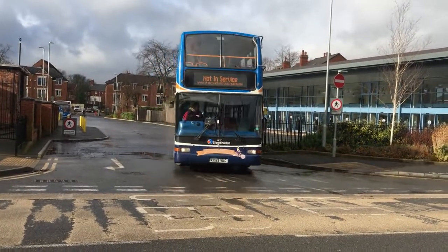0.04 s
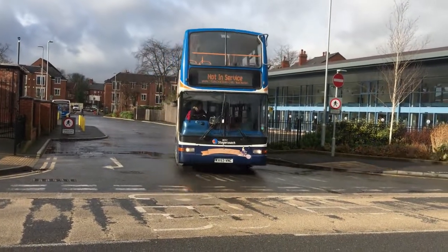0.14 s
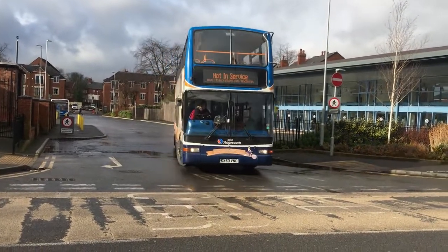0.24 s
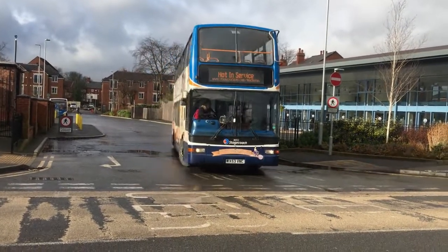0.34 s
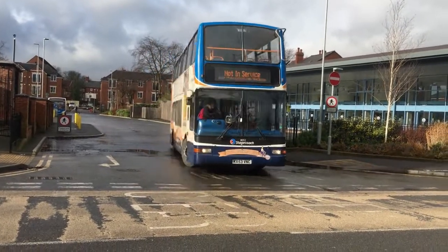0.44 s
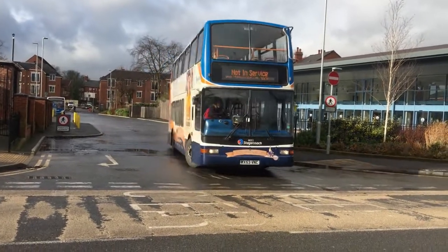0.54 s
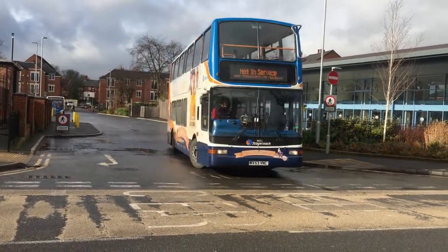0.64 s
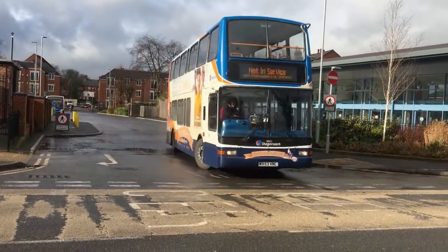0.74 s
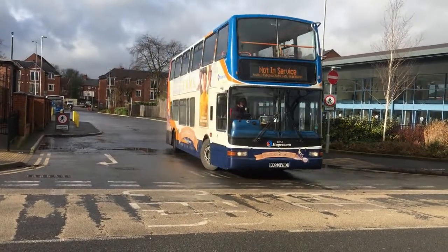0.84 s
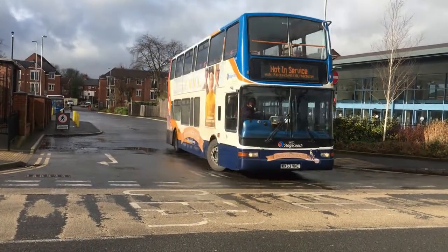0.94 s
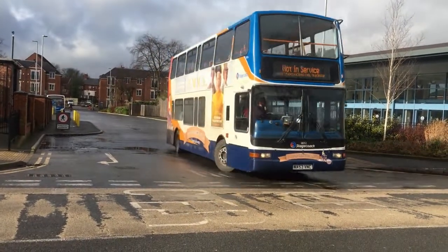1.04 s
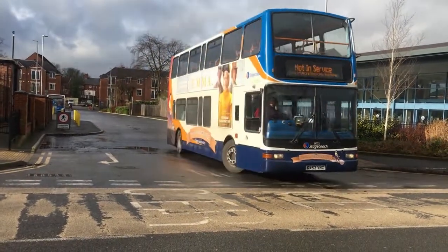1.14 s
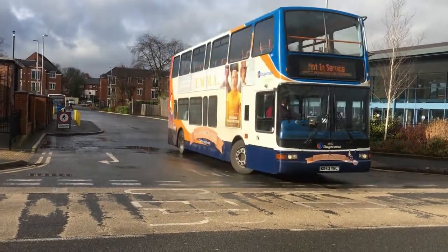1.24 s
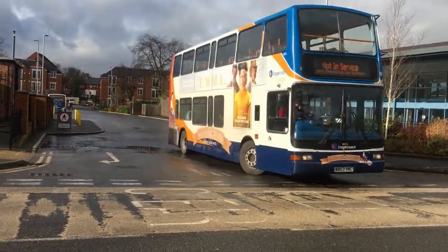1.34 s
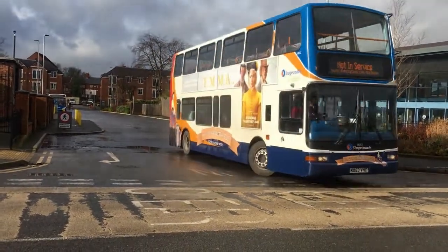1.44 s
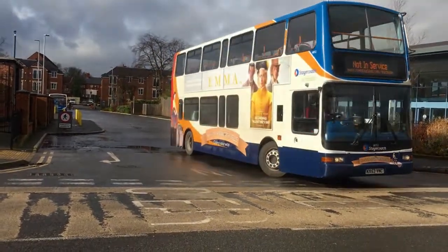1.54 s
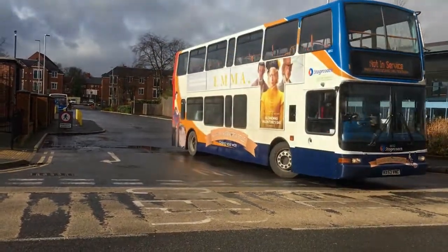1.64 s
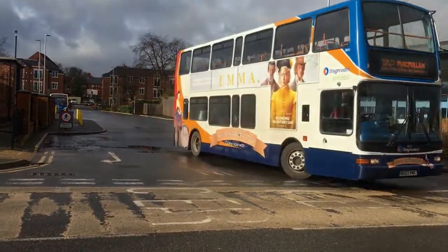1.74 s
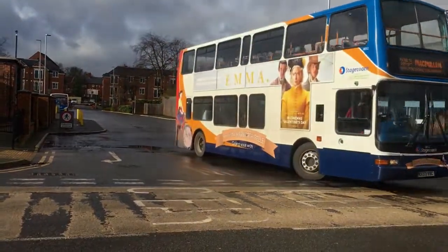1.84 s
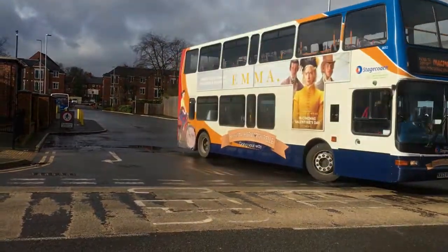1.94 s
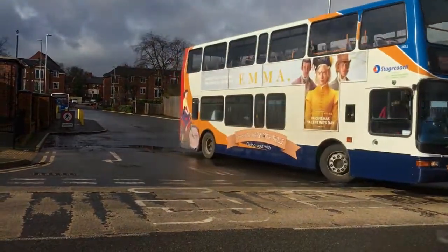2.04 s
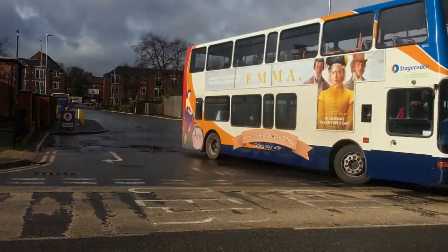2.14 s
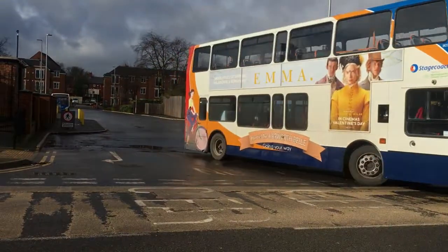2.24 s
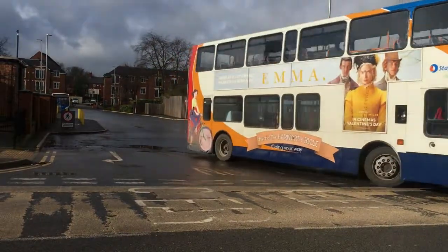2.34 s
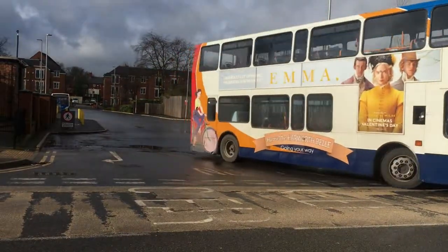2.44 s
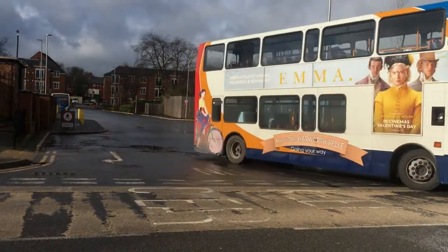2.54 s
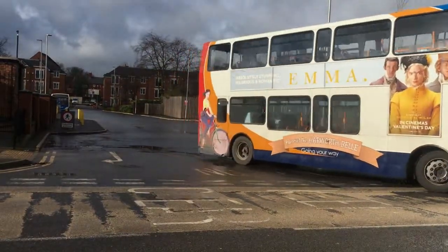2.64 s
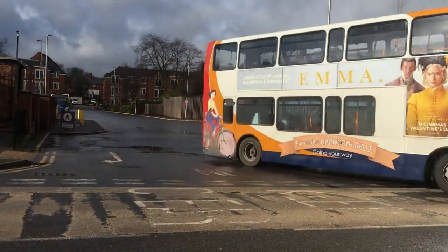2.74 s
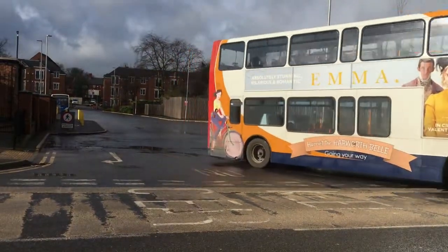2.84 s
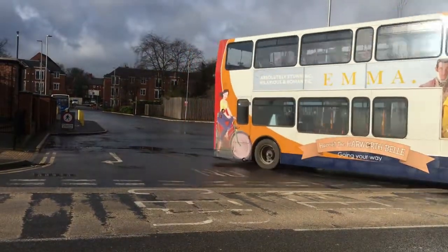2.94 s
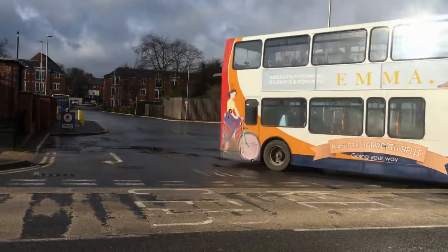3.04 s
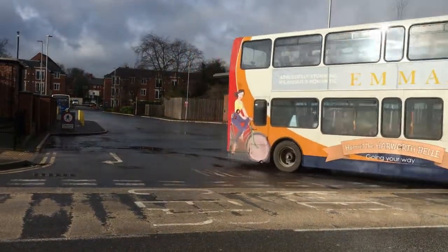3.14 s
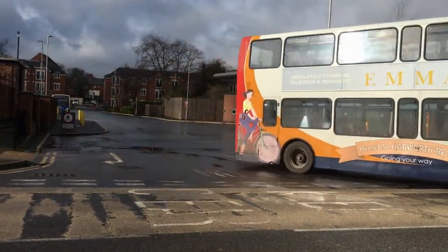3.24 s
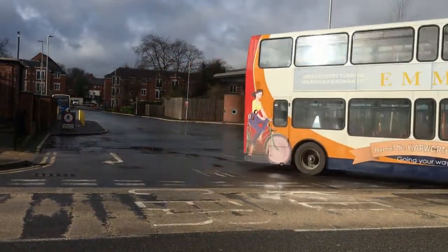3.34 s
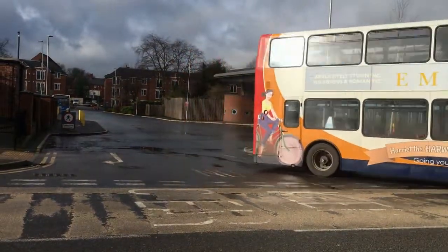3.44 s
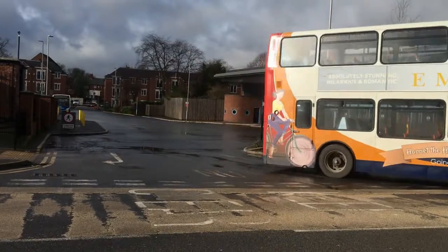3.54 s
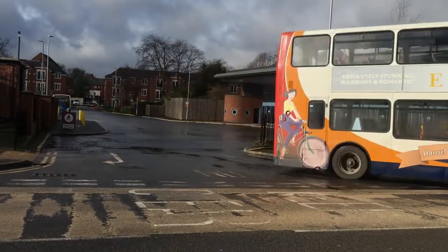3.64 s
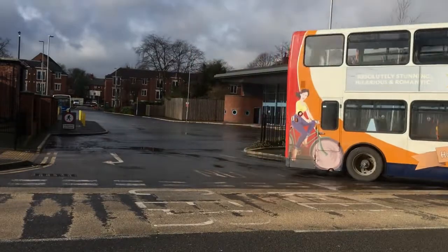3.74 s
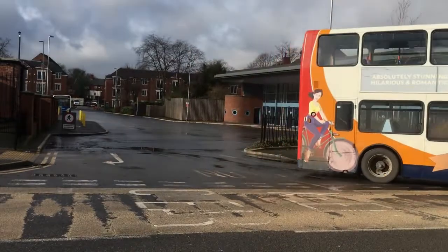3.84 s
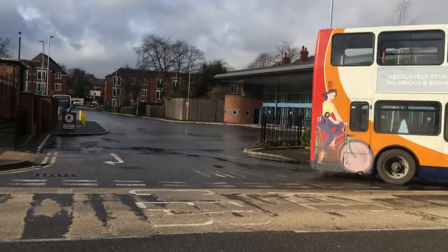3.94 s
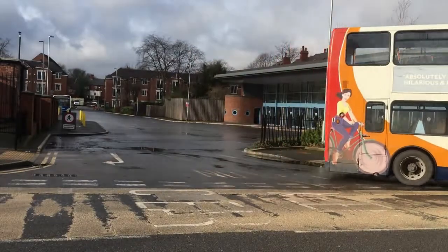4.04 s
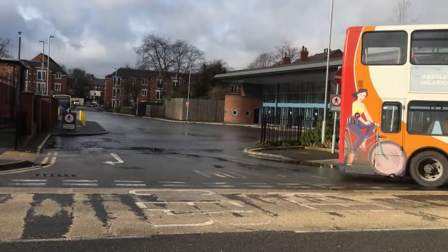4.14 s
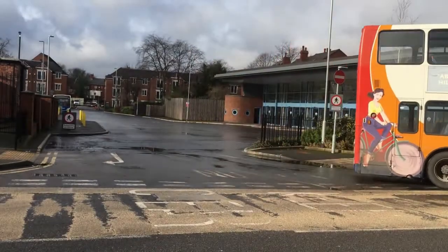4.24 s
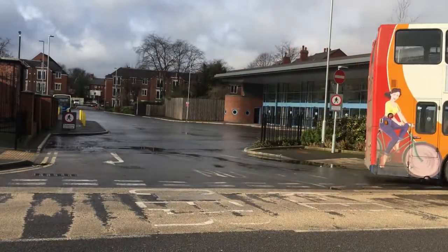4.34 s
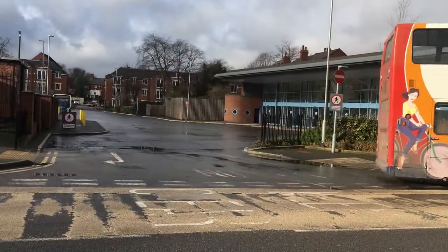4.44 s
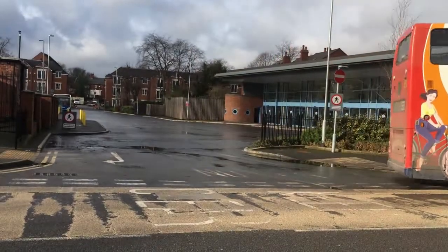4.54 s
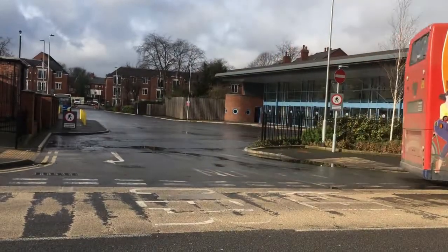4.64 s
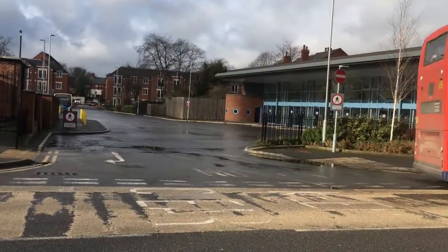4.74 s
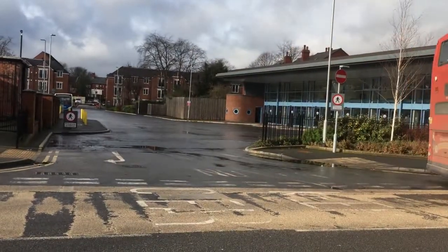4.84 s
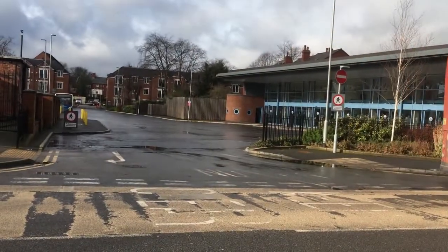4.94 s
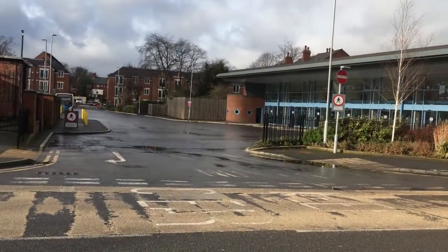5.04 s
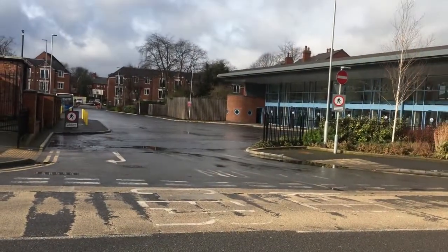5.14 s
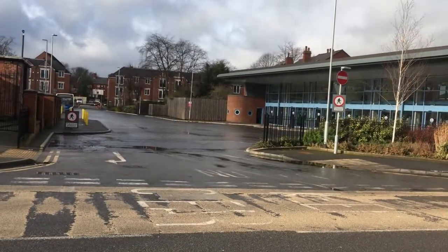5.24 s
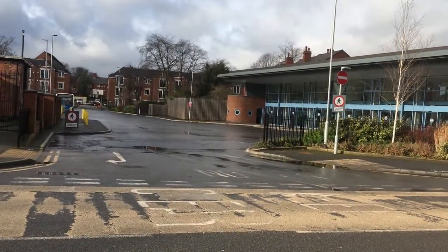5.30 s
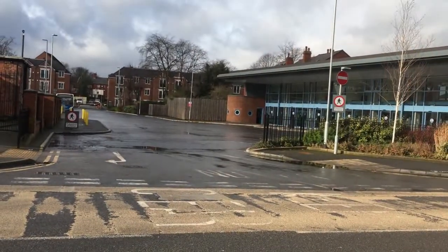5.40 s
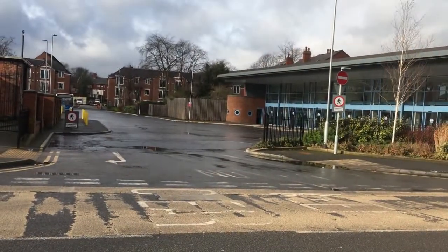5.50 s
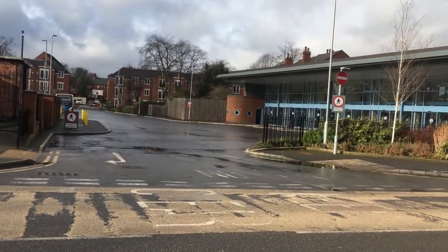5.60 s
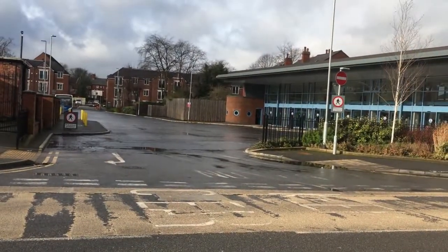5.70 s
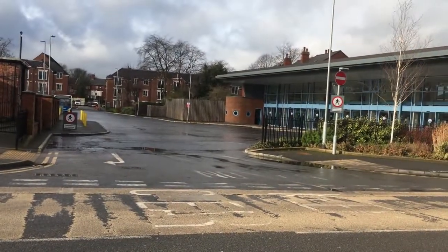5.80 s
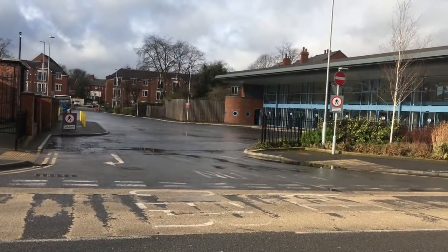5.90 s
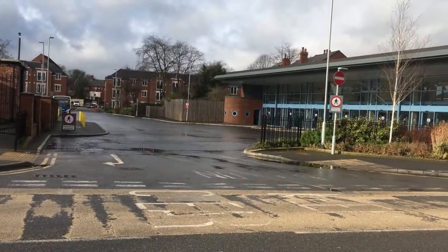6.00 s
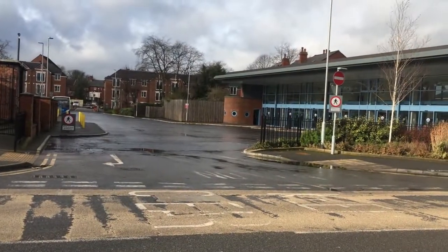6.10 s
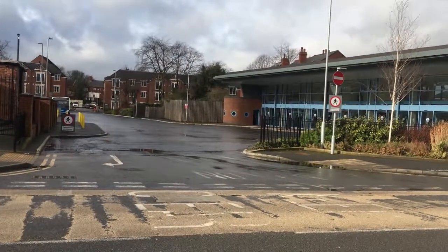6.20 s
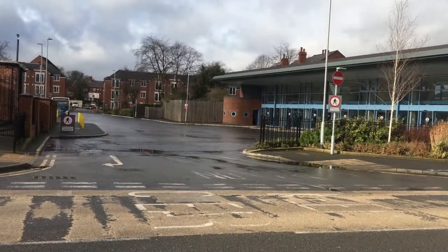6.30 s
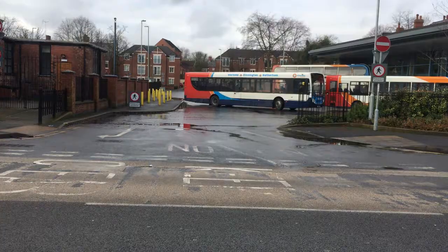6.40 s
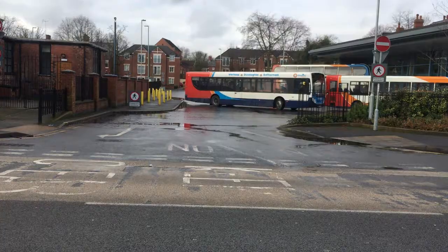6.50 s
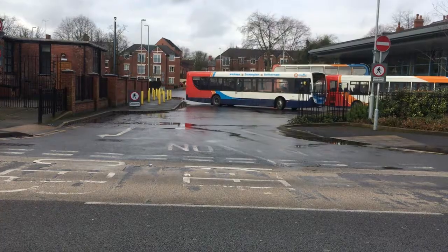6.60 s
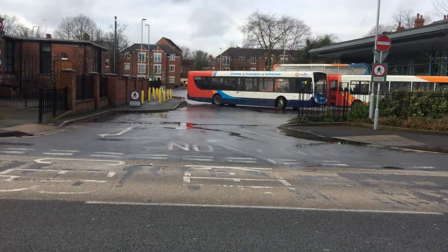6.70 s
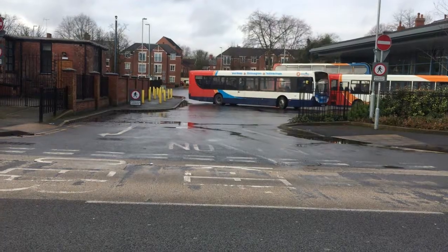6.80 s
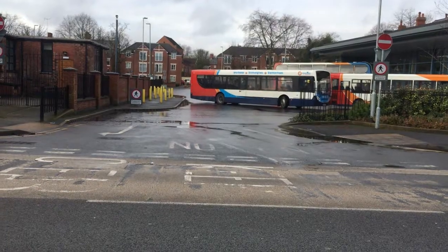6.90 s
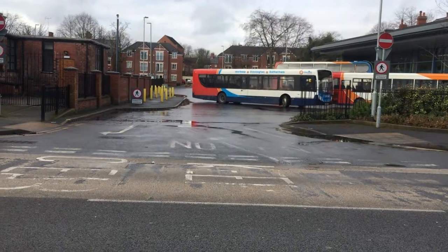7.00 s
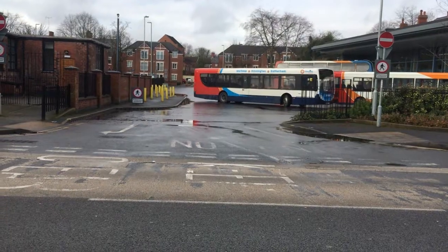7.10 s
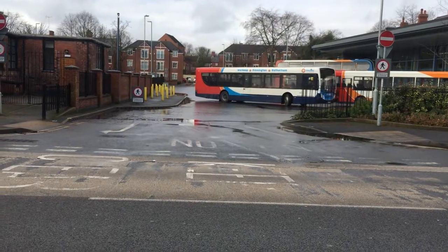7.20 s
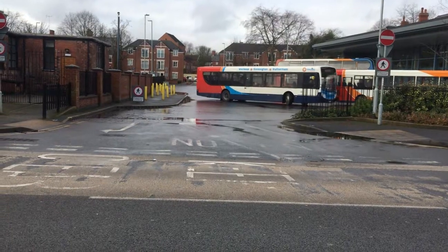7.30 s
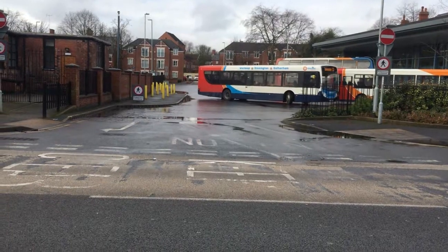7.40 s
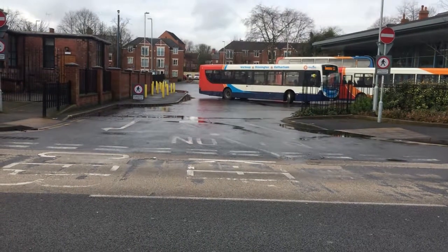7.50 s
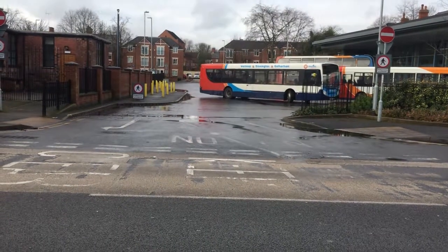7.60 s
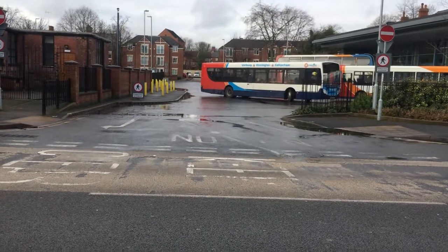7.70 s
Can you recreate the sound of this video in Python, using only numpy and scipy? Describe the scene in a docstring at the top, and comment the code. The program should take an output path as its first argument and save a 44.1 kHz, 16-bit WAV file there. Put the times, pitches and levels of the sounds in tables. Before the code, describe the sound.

Deep diesel engine drone climbs in pitch and passes with knocking and wet tyre hiss amid wind buffeting, then cuts abruptly to quieter faraway idling.

```python
"""Diesel bus on a wet road

A six-cylinder bus pulls out, booms past, lifts off and leaves: tones and gated knock follow its firing rate.
A second vehicle whines by behind it on sinking tones; coloured noise makes the town, road and tyre spray.
Gusts of low noise and short dull slaps thump on the microphone. After a short dropout only the far depot
is left: rumble, roar and wavering hums, where another bus idles and revs."""
import sys
import numpy as np
from scipy import signal
from scipy.fft import rfft, irfft, next_fast_len
from scipy.io import wavfile
from scipy.ndimage import uniform_filter1d

SR = 44100
rng = np.random.default_rng(int(sys.argv[2]) if len(sys.argv) > 2 else 0)


def master_out(mix):
    """Clip the mix to full scale and print it as 16-bit PCM to the path in sys.argv[1]."""
    frames = np.transpose(np.atleast_2d(mix))
    ceiling = np.clip(frames, -1, 1)
    pcm = np.round(ceiling * 32767).astype(np.int16)
    wavfile.write(sys.argv[1], SR, pcm)


N = 342068

# Broad background noise: (time [s], town rumble [dB], road and engine roar [dB])
TRAFFIC_LEVELS = [(0, -39.5, -52.5), (.5, -53, -53), (1.0, -43, -50), (1.9, -41.5, -48.5),
                  (2.4, -38, -46.5), (3.4, -38.5, -46), (3.9, -37, -45.5), (4.62, -41.5, -42),
                  (4.7, -35, -45.5), (5.6, -40, -46), (6.39, -39.5, -47.5), (6.41, -40.5, -49.5),
                  (7.0, -40.5, -48.5), (7.4, -42.5, -49.5), (7.6, -40, -47), (7.76, -42, -49.5)]
# Wet tyre hiss: (time [s], level [dB])
SPRAY_LEVELS = [(0.0, -66), (0.02, -67), (1.9, -66), (3.83, -61.5), (5.12, -61.5), (6.31, -63), (6.36, -65)]
# Noise colours, relative density: (frequency [Hz], level [dB per Hz])
RUMBLE_COLOUR = [(28, -23), (39, -1), (55, 4.5), (100, -5), (160, -4), (250, -9.5), (330, -12), (420, -21),
                 (600, -34.5)]
ROAR_COLOUR = [(250, -8.5), (400, 0.5), (500, 0.5), (1000, 2.5), (1300, -2), (1600, -8.5), (2000, -12),
               (2500, -19.5), (3200, -26), (4500, -34), (8000, -49.5)]
SPRAY_COLOUR = [(1500, -8.5), (2500, -1.5), (2900, -5), (4400, -11), (5600, -15.5), (7000, -20.5),
                (8000, -26), (10000, -27.5), (15000, -46.5)]
BUFFET_COLOUR = [(25, -28.5), (42, 0.5), (65, 1), (120, 0.5), (200, -5.5), (320, -10.5), (420, -23),
                 (550, -28.5), (800, -57.5)]
KNOCK_COLOUR = [(500, -23.5), (900, -12.5), (1050, 0.5), (1470, 2), (2000, -5.5), (2300, -2), (2650, -12),
                (2950, -16), (4500, -30.5), (7000, -44)]
# Hums of idling engines: (start [s], stop [s], first pitch [Hz], last pitch [Hz], level [dB])
DISTANT_HUMS = [(0, 0.339, 142.5, 148.4, -45), (0.752, 1.343, 145, 143.8, -43),
                (0.803, 1.297, 118.5, 120.5, -45.5), (.95, 1.4, 182, 188, -51),
                (6.45, 7.76, 53.6, 57.1, -59), (7.296, 7.796, 155.4, 167.7, -44.5),
                (6.604, 6.923, 935, 943, -57), (7.31, 7.704, 312, 330, -55)]
# Gusts on the microphone: (start [s], length [s], level [dB], sharpness of the upper thump [dB])
GUSTS = [(0.168, 0.03, -19.5, -13.5), (0.432, 0.03, -27, -16.5), (.52, 0.019, -33.5, -16),
         (0.596, 0.021, -30.5, 7), (0.647, 0.076, -25, -8), (1.284, 0.06, -30, -6.5),
         (1.38, 0.033, -33.5, -6), (1.563, 0.02, -18, -16), (1.651, 0.14, -30, 3),
         (2.007, 0.028, -30.5, -18), (2.21, .025, -36, -9), (2.3, 0.03, -43, -12), (2.478, 0.19, -43, 4),
         (2.692, 0.069, -37.5, 0.5), (2.982, 0.047, -29.5, -9.5), (3.095, 0.022, -28, -16),
         (3.16, 0.19, -29, -9), (3.468, 0.1, -24.5, -6), (3.621, 0.019, -24, -21), (3.78, 0.036, -29, -9),
         (3.866, 0.12, -26, -6.5), (4.042, 0.048, -22, -7.5), (4.125, .13, -24.5, -3),
         (4.292, 0.046, -31.5, 15), (4.39, 0.05, -37, -2), (4.481, 0.067, -30, 7.5), (4.77, 0.068, -40, -1)]
# Sudden slaps of air on the microphone port: (start [s], strength [dB], pitch [Hz])
AIR_SLAPS = [(0.168, -30, 90), (0.183, -24, 112), (0.445, -28.5, 90), (0.592, -26, 198),
             (0.608, -27.5, 218), (0.657, -28, 139), (0.676, -29, 140), (0.694, -24, 150),
             (1.332, -25, 222), (1.546, -25, 121), (1.703, -15.5, 131), (2.971, -37, 196),
             (3.169, -30, 137), (3.229, -24, 186), (3.458, -13.5, 140), (3.503, -26, 121), (3.56, -26, 121),
             (3.643, -24, 170), (3.69, -37, 121), (3.93, -17, 175), (4.116, -17, 185), (4.156, -18, 151),
             (4.2, -26, 121), (4.228, -20, 156), (4.298, -25, 307), (4.489, -20, 121), (4.521, -32, 135),
             (4.904, -24.5, 121)]
# Engine speed of the vehicle passing behind: (time [s], firing rate [firings per s])
SECOND_SPEED = [(5.1, 78.5), (5.3, 76), (5.8, 73.3), (6.4, 71.3)]
# Its firing tones and gear whine: (multiple of the firing rate, level [dB])
SECOND_ORDERS = [(1, -44), (2, -45), (3, -47), (6, -61), (12, -55), (36, -71), (48, -81), (60, -80)]
# Turbo whistle: (time [s], pitch [Hz], level [dB])
TURBO_WHISTLE = [(1.9, 5100, -90), (2.12, 5330, -81), (2.4, 5950, -87), (2.6, 6350, -86), (2.8, 6650, -80),
                 (3.0, 6900, -87), (3.3, 7300, -90)]
# Bus engine speed: (time [s], firing rate [firings per s])
BUS_SPEED = [(1.3, 39), (1.67, 45.3), (2.03, 48.9), (2.44, 54.5), (2.69, 56.6), (2.9, 58.3), (4.3, 58.4),
             (4.5, 56.4), (4.72, 52.1), (5.0, 45.1), (5.3, 40)]
# Bus engine loudness: (time [s], exhaust boom [dB], knock [dB])
BUS_LEVELS = [(0, -29, -58.5), (1.4, -37, -55.5), (1.6, -27.5, -53.5), (2.3, -22, -51), (2.67, -22, -48.5),
              (2.95, -29.5, -48), (3.3, -26, -47.5), (3.45, -33, -48.5), (3.9, -37, -45.5),
              (4.55, -33, -49), (4.68, -47, -54), (4.85, -26.5, -51), (4.95, -45, -59), (6.4, -48, -54)]
# Bus gear and body tones: (multiple of the firing rate, level [dB], loudest at [s], time to lose 9 dB [s])
BUS_ORDERS = [(2, -39, 2.05, .35), (2, -37, 4.0, .7), (3, -45, 3.1, .4), (4, -46, 2.15, .4),
              (11 / 3, -46, 3.2, .35), (14 / 3, -47, 3.4, 1.1), (5.5, -48, 3.6, .6), (10, -54, 3.95, .6),
              (38 / 3, -55.5, 3.6, .9), (52 / 3, -57, 3.5, 1.1), (20, -58, 3.0, .5), (70 / 3, -59, 3.8, .6),
              (39, -66, 3.8, .7), (48, -72, 3.9, .5), (56, -76, 4.0, .7), (39, -56, 4.6, .16),
              (45, -58, 4.9, .22), (36.5, -57, 5.04, .1), (22.3, -50, 4.93, .12), (43, -62, 4.45, .12)]
# Strength of each knock, in the firing order: (level [dB])
CYLINDER_LEVELS = [-4, -4, -4.5, -5.5, -5.5, -7.5]
# Dips of the microphone port: (frequency [Hz], width [Hz], share removed)
PORT_DIPS = [(4960, 500, 0.38), (10400, 580, .5)]

GUST_RISE_S, GUST_FALL_S = .025, .024  # time to gain or lose 20 dB
BREEZE_DB, BREEZE_SWELL_DB, BREEZE_SHARP_DB = -43, .5, -.5  # steady buffeting under the gusts
WIND_DEEP_DB = .5  # most lift the deepest bands get
SECOND_FADE_DB_PER_S = 5
DROPOUT_START_S, DROPOUT_END_S, DROPOUT_EDGE_S = 6.37796, 6.42583, .00015
SELF_NOISE_DB = -82  # before its treble is softened
CUTOFF_HZ = 15750


def from_db(db):
    """Gain of a level in dB."""
    return 10 ** (np.asarray(db) / 20)


def rms_one(x):
    """Scaled to rms 1."""
    return x / np.sqrt(np.mean(x ** 2) + 1e-20)


def in_time(rows):
    """Table columns as curves, one value a sample."""
    s, *columns = np.transpose(rows)
    return [np.interp(np.arange(N) / SR, s, column) for column in columns]


def sounding_db(start, stop, fade):
    """Level that is 0 dB from start to stop and falls 20 dB per fade time [s] outside."""
    t = np.arange(N) / SR
    return np.minimum(0, np.minimum(t - start, stop - t) * 20 / fade)


def drift(rate):
    """Chance wobble of spread 1: noise through a double one-pole low-pass at rate [Hz], slowest part removed."""
    pole = np.exp(-200 * np.pi * rate / SR)  # one point every 100 samples
    points = rng.standard_normal(N // 100 + 902)
    slow = signal.lfilter([1], [1, -2 * pole, pole * pole], points)[900:]  # skip the run-in
    slow = slow - uniform_filter1d(slow, size=250)
    return np.interp(np.arange(N) / 100, np.arange(len(slow)), rms_one(slow))


def bands(colour, flicker_db, source=None):
    """Coloured noise or source in overlapping octaves, each flickering alone: (centres [Hz], bands), rms 1 in sum."""
    hz, level_db = np.transpose(colour)
    size = next_fast_len(N)
    octave = np.log2(np.arange(1, size // 2 + 2) * SR / size)
    gain = from_db(np.interp(octave, np.log2(hz), level_db, left=-np.inf, right=-np.inf))
    if source is None:
        source = rng.standard_normal(size)
    spectrum = gain * rfft(source, size)
    centres = np.arange(np.log2(hz[0]), np.log2(hz[-1]) + 1)
    layers = []
    for centre in centres:
        overlap = np.clip(1 - abs(octave - centre), 0, 1)
        band = irfft(spectrum * overlap, size)[:N]
        layers.append(band * from_db(flicker_db * drift(24.0)))
    layers = np.array(layers)
    return 2 ** centres, layers / np.sqrt(np.mean(layers.sum(axis=0) ** 2))


def tone(turns, level_db, waver_db):
    """A sine on a phase counted in turns, wavering in level as echoes shift."""
    level_db, out = level_db + waver_db * drift(8.9), np.zeros(N)
    heard = level_db > -110  # leave the inaudible stretches silent
    sine = np.sin(2 * np.pi * (turns[heard] + rng.random()))
    out[heard] = np.sqrt(2) * sine * from_db(level_db[heard])
    return out


def traffic():
    """Rumble of the town, roar of road and engines, and tyre spray off the wet surface until the dropout."""
    rumble_db, roar_db = in_time(TRAFFIC_LEVELS)
    spray_db = in_time(SPRAY_LEVELS)[0] + sounding_db(-1, DROPOUT_START_S, fade=.005)
    rumble = from_db(rumble_db) * bands(RUMBLE_COLOUR, flicker_db=0.0)[1].sum(axis=0)
    roar = from_db(roar_db) * bands(ROAR_COLOUR, flicker_db=.74)[1].sum(axis=0)
    spray = from_db(spray_db) * bands(SPRAY_COLOUR, flicker_db=.5)[1].sum(axis=0)
    return rumble + roar + spray


def hums():
    """Tones of engines at a distance that glide in pitch as they come and go."""
    out = np.zeros(N)
    for start, stop, first_hz, last_hz, level_db in DISTANT_HUMS:
        hz, = in_time([(start, first_hz), (stop, last_hz)])
        out += tone(np.cumsum(hz) / SR, level_db + sounding_db(start, stop, fade=.19), waver_db=.5)
    return out


def gusts():
    """Each gust rises, holds and falls above the breeze; the strongest weighs most: (push, sharpness [dB])."""
    t = np.arange(0, N / SR + .002, .001)
    start, length, level_db, sharp_db = np.transpose(GUSTS)[:, :, None]
    rise = (t - start) / GUST_RISE_S
    fall = (start + length - t) / GUST_FALL_S
    push = from_db(level_db + 20 * np.minimum(0, np.minimum(rise, fall)))
    gust, gust_sharp = in_time(np.transpose([t, push.sum(axis=0), (push * sharp_db).sum(axis=0)]))
    breeze = from_db(BREEZE_DB + BREEZE_SWELL_DB * drift(5.7))
    total = gust + breeze
    return total, (gust_sharp + breeze * BREEZE_SHARP_DB) / total


def wind():
    """Low noise held to the push of each gust until the dropout; sharp gusts reach higher."""
    push, sharp_db = gusts()
    centres, noise = bands(BUFFET_COLOUR, flicker_db=2.0)
    # even out the chance swells within each band, so each gust's rise and fall is heard clearly
    average = np.mean(noise ** 2, axis=1, keepdims=True) + 1e-20
    swell = np.sqrt(uniform_filter1d(noise ** 2, size=1800) / average + .05)
    up = np.clip(np.log2(centres / 130), 0, 1.1)[:, None]
    down = np.clip(np.log2(90 / centres), 0, 1)[:, None]
    tilt = from_db(up * sharp_db + down * WIND_DEEP_DB)
    gain = push * from_db(2.0 * drift(38) + sounding_db(-1, DROPOUT_START_S, fade=.01))
    buffet = gain * (noise / swell * tilt).sum(axis=0)
    return signal.sosfilt(signal.butter(4, 620, fs=SR, output="sos"), buffet)


def slaps():
    """Each slap of air is a dull push of about two cycles, of either sign."""
    out, t = np.zeros(N + SR), np.arange(SR // 20) / SR
    signs = rng.choice([-1, 1], len(AIR_SLAPS))
    for (start, strength_db, hz), sign in zip(AIR_SLAPS, signs):
        shape = hz * t * np.exp(1 - 1.5 * hz * t)
        push = sign * from_db(strength_db) * shape * np.sin(2 * np.pi * hz * t)
        out[round(start * SR):][:len(t)] += push
    return out[:N]


def second_vehicle():
    """Firing tones and gear whine that sink in pitch as it draws away; the dropout ends them."""
    rate, = in_time(SECOND_SPEED)
    turns = np.cumsum(rate * (1 + .003 * drift(20))) / SR
    heard_db = sounding_db(5.2, 8, fade=.15) + sounding_db(0, DROPOUT_START_S, fade=.005)
    leaving_db = -SECOND_FADE_DB_PER_S * (np.arange(N) / SR - SECOND_SPEED[0][0])
    out = np.zeros(N)
    for multiple, level_db in SECOND_ORDERS:
        fade_db = leaving_db * (multiple in (2, 3))  # only these low tones fade with distance
        out += tone(multiple * turns, level_db + heard_db + fade_db, waver_db=3.0)
    return out


def turbo():
    """A whistle that climbs with the load, made breathy by fast chance wobble in pitch."""
    hz, level_db = in_time(TURBO_WHISTLE)
    turns = np.cumsum(hz + 80 * drift(60)) / SR
    return tone(turns, level_db + sounding_db(1.9, 3.3, fade=.15), waver_db=3.5)


def knock(turns):
    """Each firing shakes the block the same way, so the firing order shows through a hiss gated by each knock."""
    cylinder = turns.astype(int) % len(CYLINDER_LEVELS)
    strength = from_db(np.array(CYLINDER_LEVELS)[cylinder])
    firings = strength * (np.diff(np.floor(turns), prepend=0) > 0)
    ring = np.arange(SR // 10)
    block = rng.standard_normal(SR // 10) * np.exp(-ring / (.0079 * SR))
    shakes = rms_one(signal.fftconvolve(firings, block)[:N])
    gate = rms_one(.52 + strength * np.exp(-3.5 * (turns % 1)))
    hiss = rng.standard_normal(N) * gate
    return bands(KNOCK_COLOUR, flicker_db=.8, source=hiss + .6 * shakes)[1].sum(axis=0)


def bus():
    """Exhaust boom at the firing rate, gear and body tones on its multiples, and knock gated by each firing."""
    (rate,), (boom_db, knock_db) = in_time(BUS_SPEED), in_time(BUS_LEVELS)
    turns, t = np.cumsum(rate * (1 + .0018 * drift(4.8))) / SR, np.arange(N) / SR
    out = tone(turns, boom_db + sounding_db(1.42, 5.5, fade=.18), waver_db=.4)
    for multiple, level_db, loudest, length in BUS_ORDERS:
        # each tone swells and fades around its own loudest moment
        swell_db = -9 * ((t - loudest) / length) ** 2
        out += tone(multiple * turns, level_db + swell_db, waver_db=3.0)
    knock_gain = from_db(knock_db + sounding_db(-1, DROPOUT_START_S, fade=.005))
    return out + knock_gain * knock(turns)


def scene():
    """All sources meet at one microphone."""
    background = traffic() + hums() + wind() + slaps()
    return (background + second_vehicle() + turbo() + bus())[None]


def record(dry):
    """Rumble filter, self-noise, two dips of the microphone port, a hard dropout and the top cut."""
    x = signal.sosfilt(signal.butter(2, 36, "high", fs=SR, output="sos"), dry)
    x = x + from_db(SELF_NOISE_DB) * signal.lfilter([1, .55], [1], rng.standard_normal(x.shape))
    for hz, width_hz, share in PORT_DIPS:
        x = x - share * signal.lfilter(*signal.iirpeak(hz, hz / width_hz, fs=SR), x)
    t = np.arange(N) / SR
    outside = np.maximum(DROPOUT_START_S - t, t - DROPOUT_END_S)
    x = x * np.clip(outside / DROPOUT_EDGE_S, 0, 1)
    return signal.sosfilt(signal.ellip(10, .5, 70, CUTOFF_HZ, fs=SR, output="sos"), x)


dry = scene()
out = record(dry)
master_out(out)
```